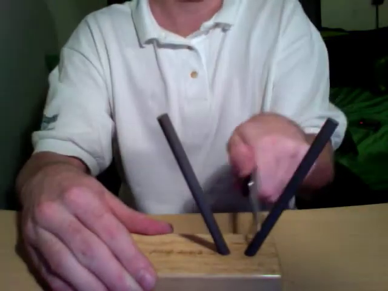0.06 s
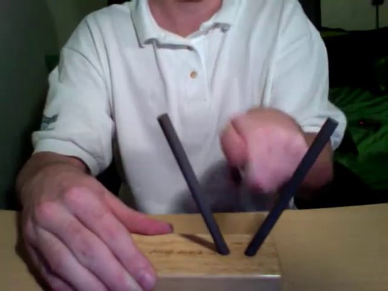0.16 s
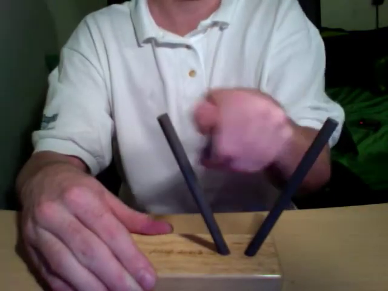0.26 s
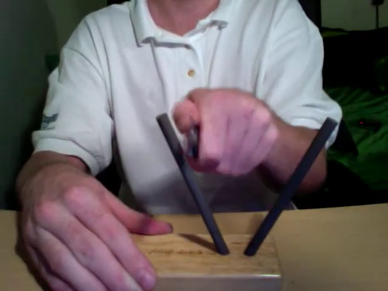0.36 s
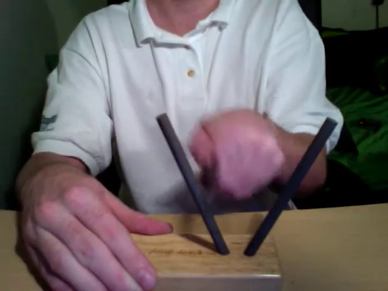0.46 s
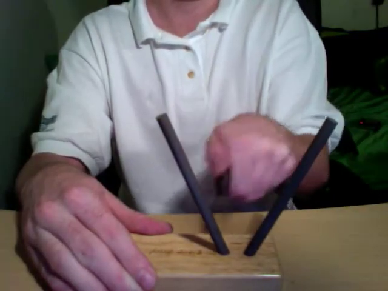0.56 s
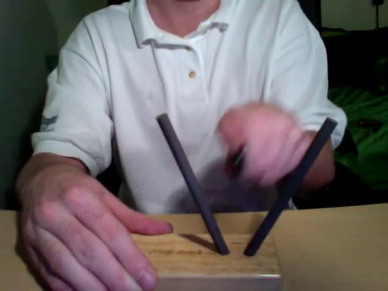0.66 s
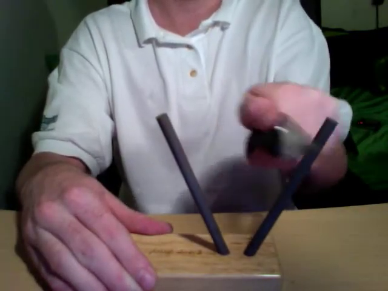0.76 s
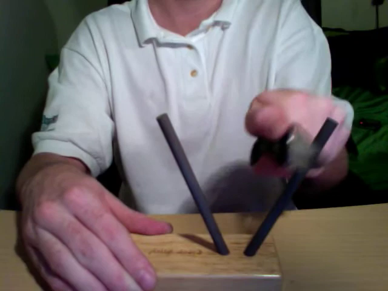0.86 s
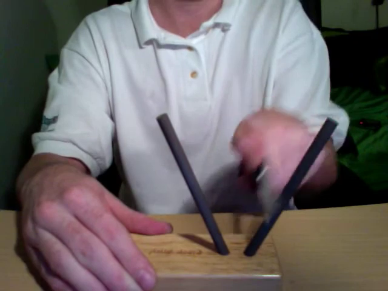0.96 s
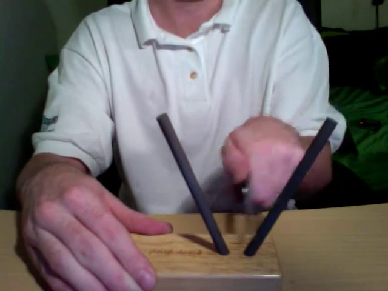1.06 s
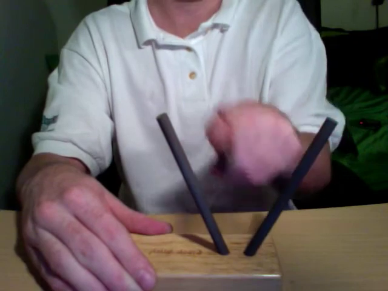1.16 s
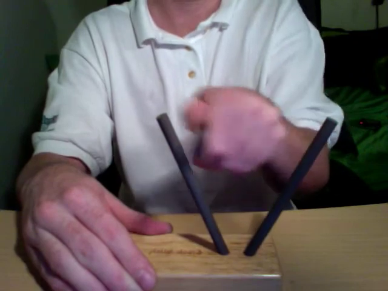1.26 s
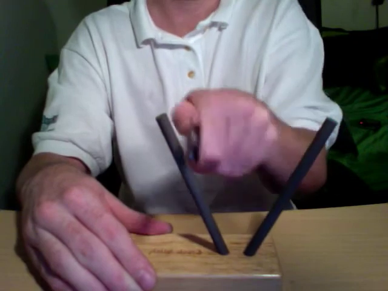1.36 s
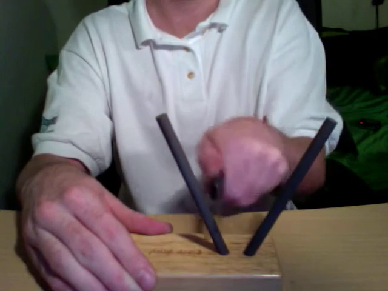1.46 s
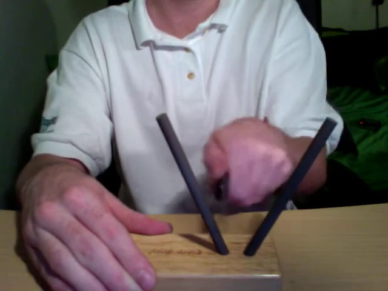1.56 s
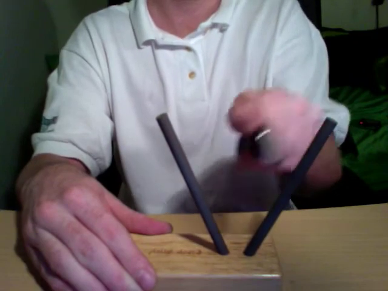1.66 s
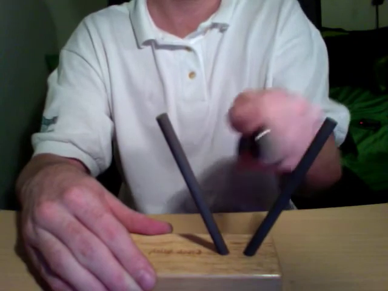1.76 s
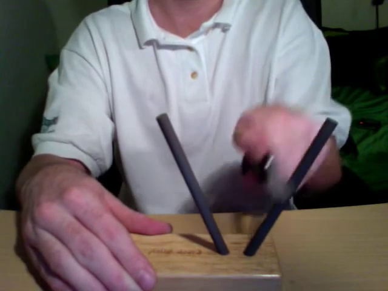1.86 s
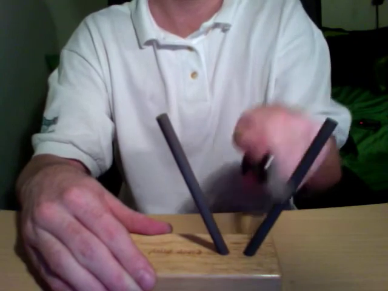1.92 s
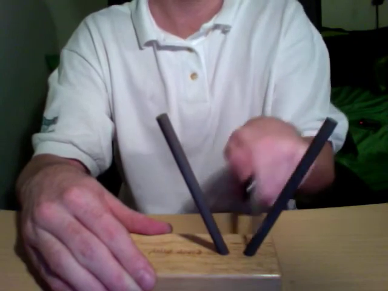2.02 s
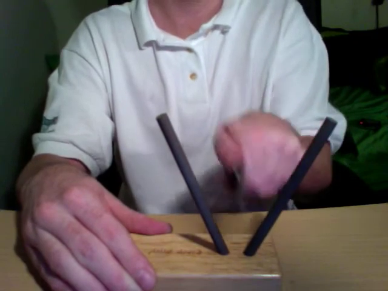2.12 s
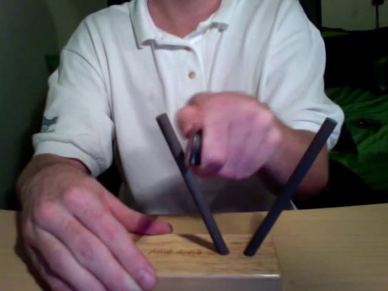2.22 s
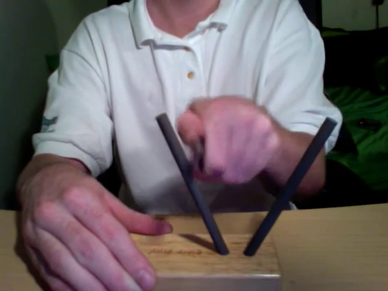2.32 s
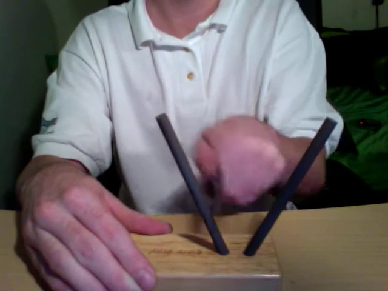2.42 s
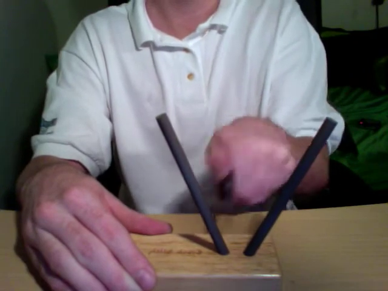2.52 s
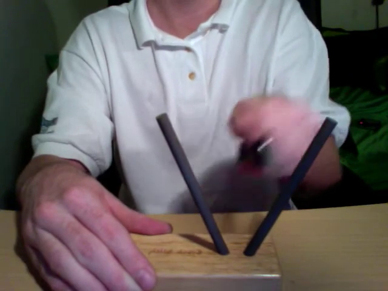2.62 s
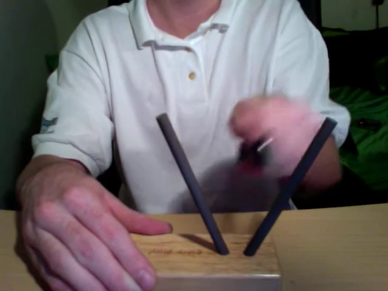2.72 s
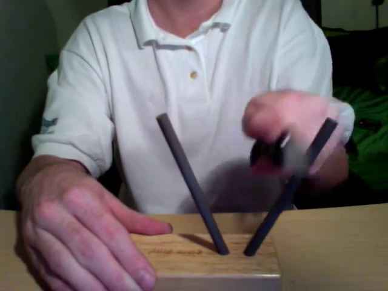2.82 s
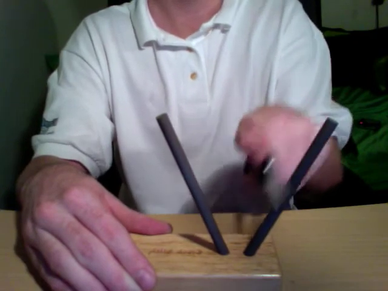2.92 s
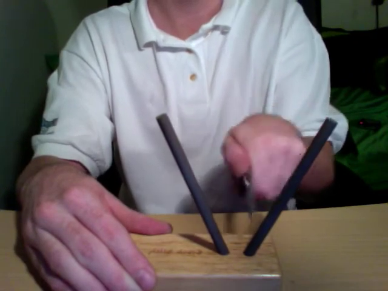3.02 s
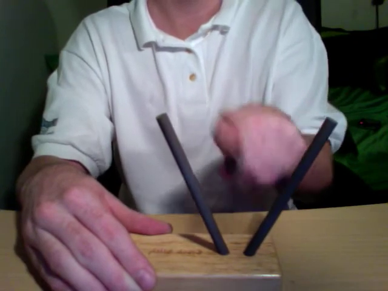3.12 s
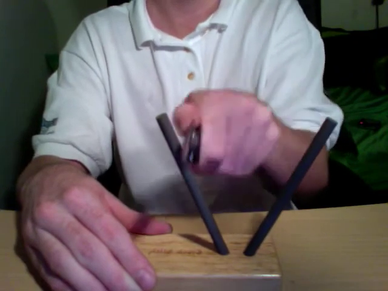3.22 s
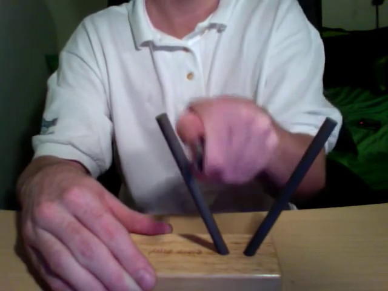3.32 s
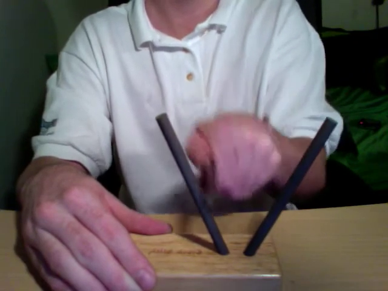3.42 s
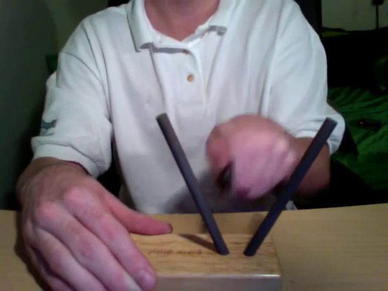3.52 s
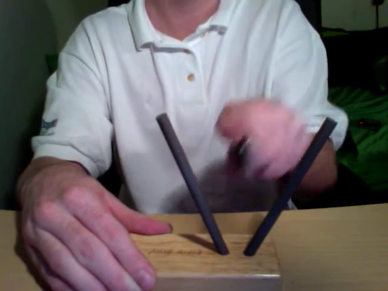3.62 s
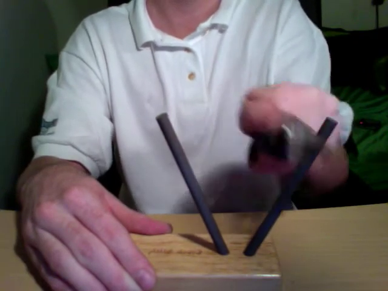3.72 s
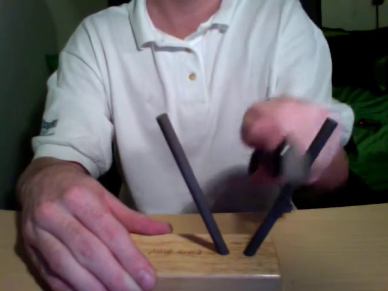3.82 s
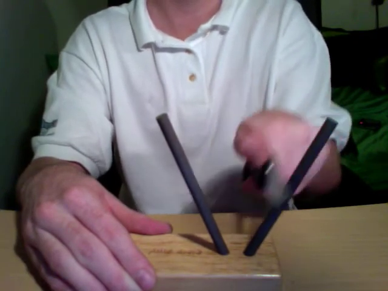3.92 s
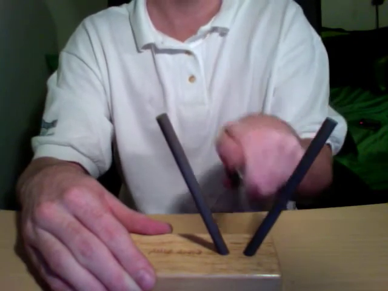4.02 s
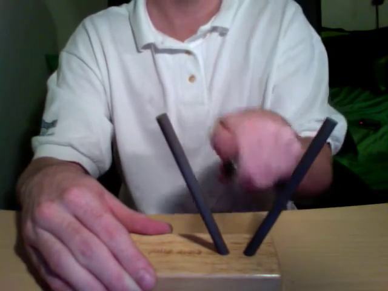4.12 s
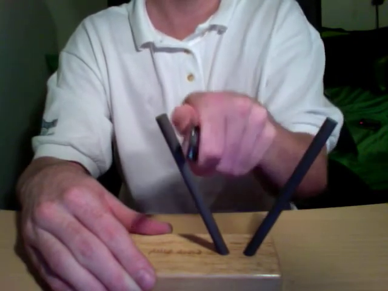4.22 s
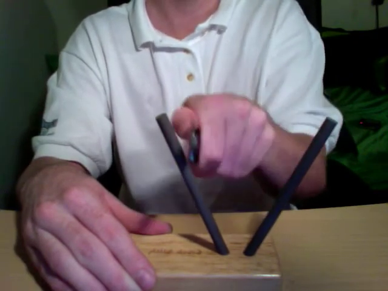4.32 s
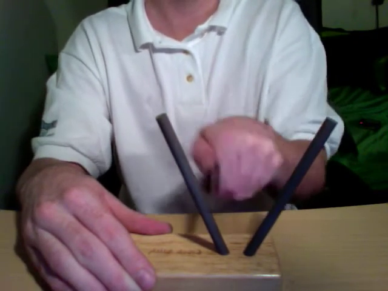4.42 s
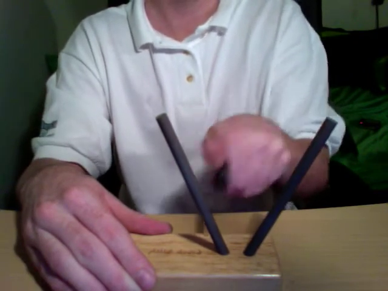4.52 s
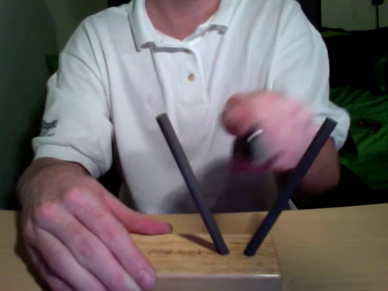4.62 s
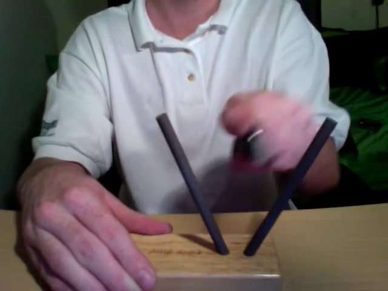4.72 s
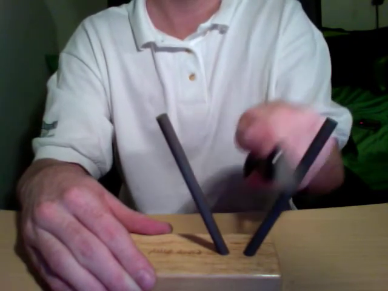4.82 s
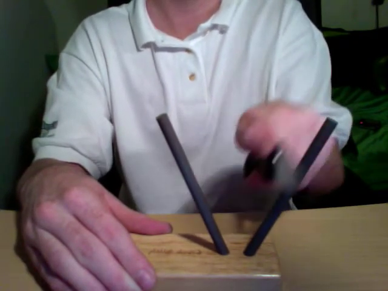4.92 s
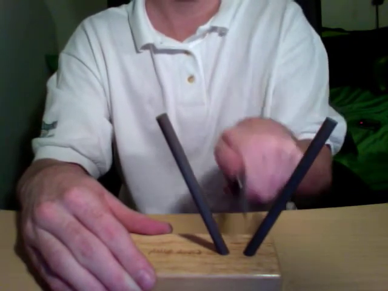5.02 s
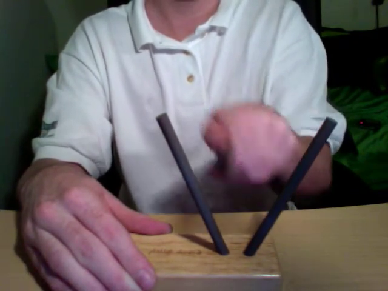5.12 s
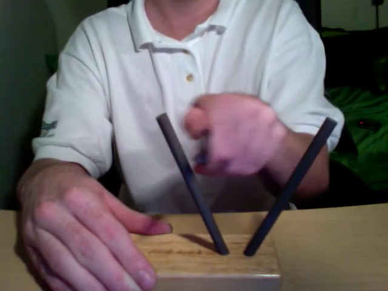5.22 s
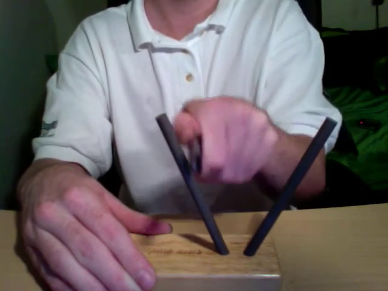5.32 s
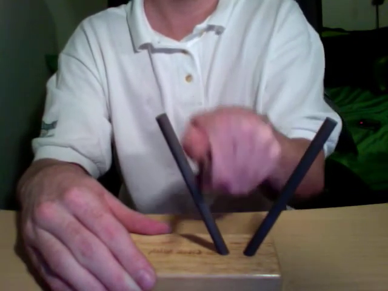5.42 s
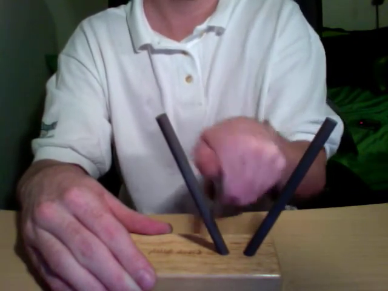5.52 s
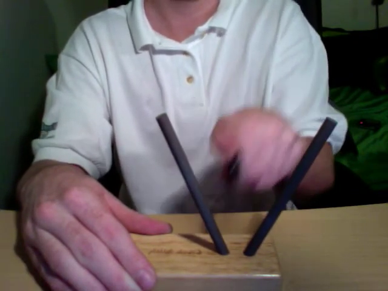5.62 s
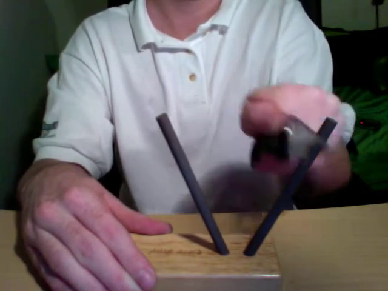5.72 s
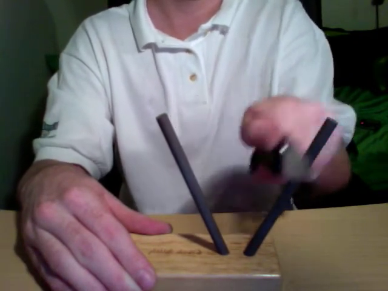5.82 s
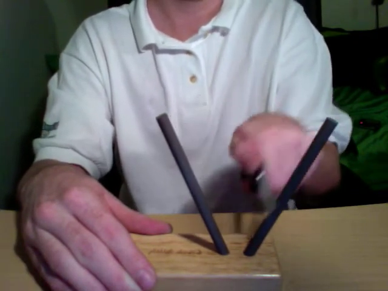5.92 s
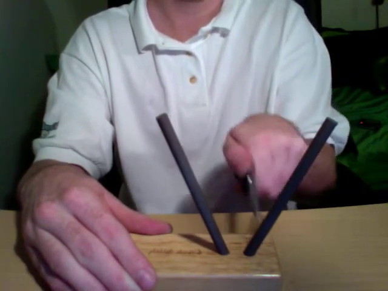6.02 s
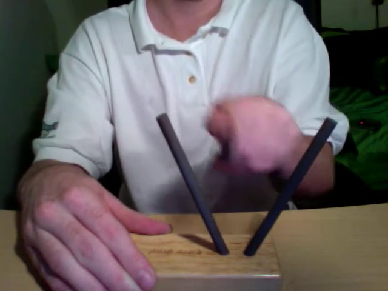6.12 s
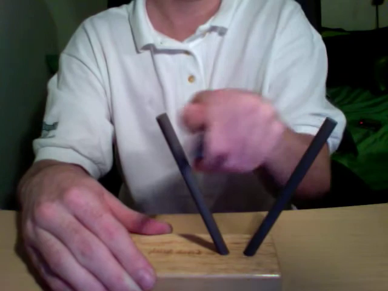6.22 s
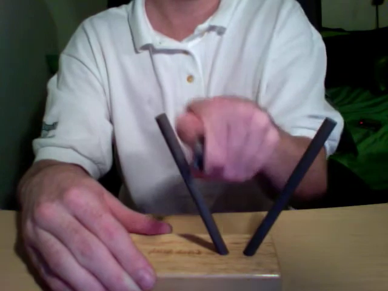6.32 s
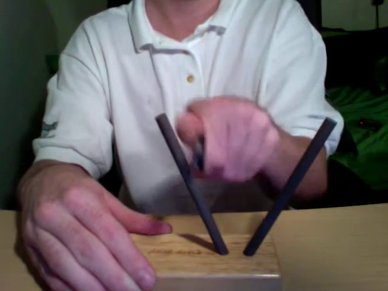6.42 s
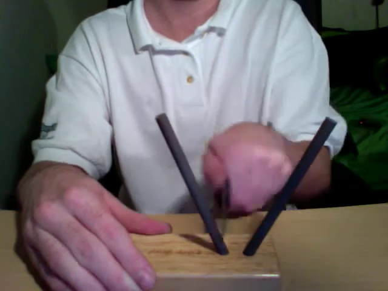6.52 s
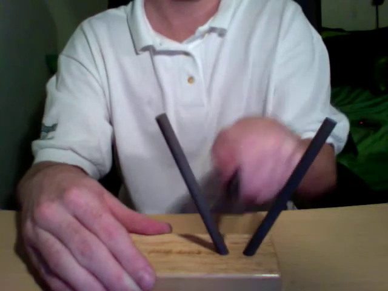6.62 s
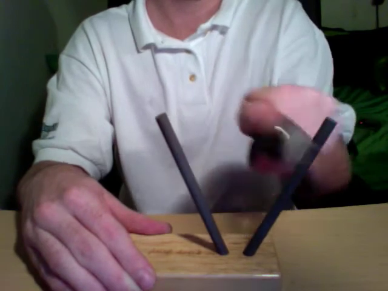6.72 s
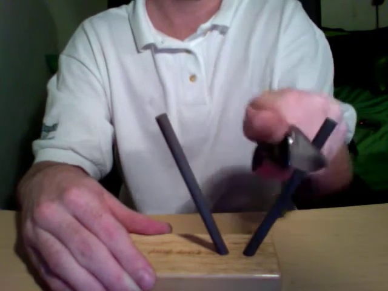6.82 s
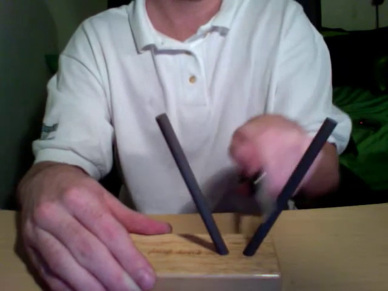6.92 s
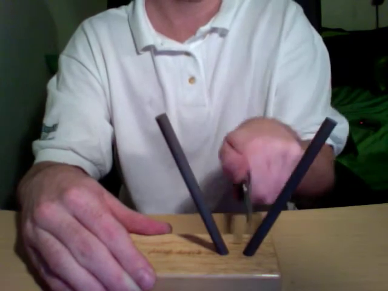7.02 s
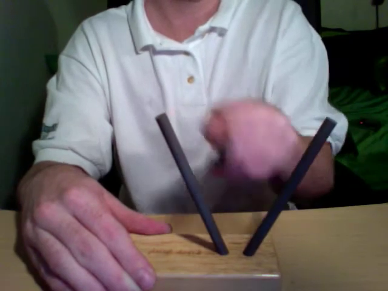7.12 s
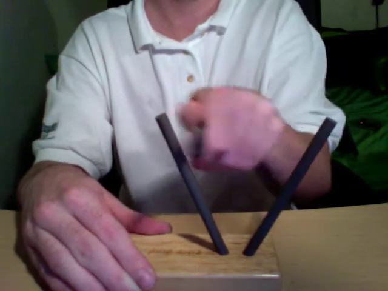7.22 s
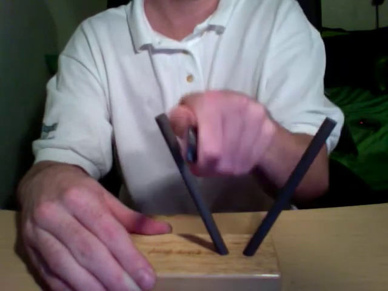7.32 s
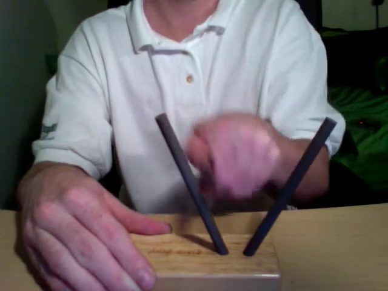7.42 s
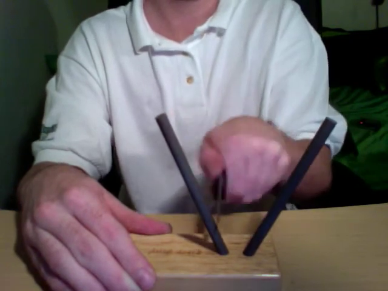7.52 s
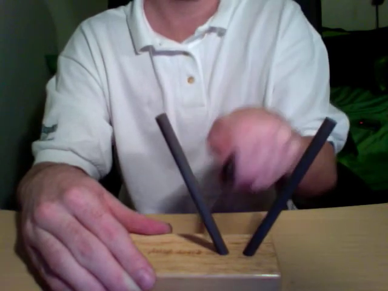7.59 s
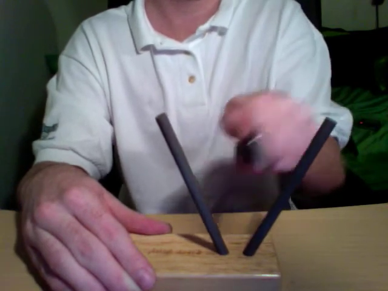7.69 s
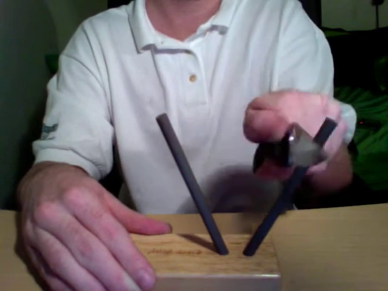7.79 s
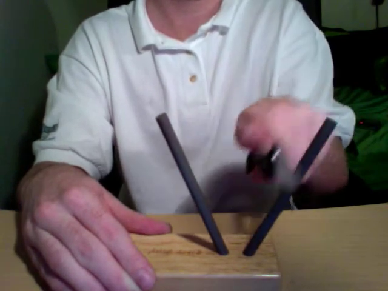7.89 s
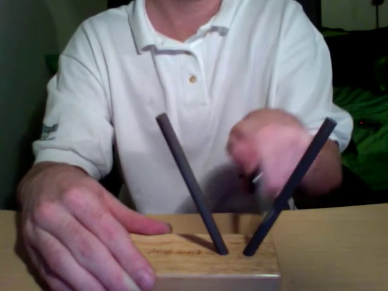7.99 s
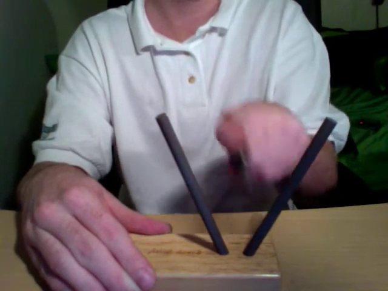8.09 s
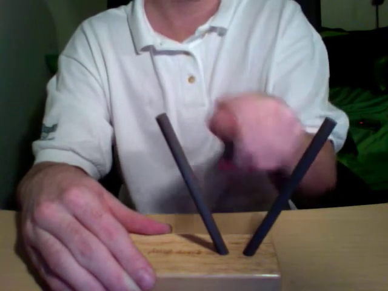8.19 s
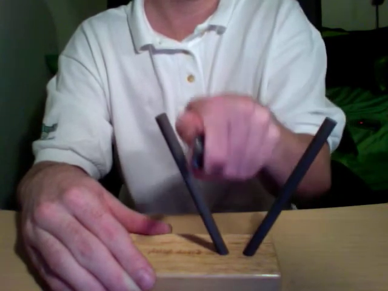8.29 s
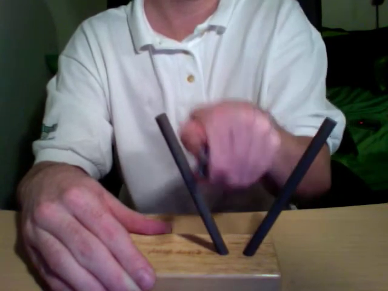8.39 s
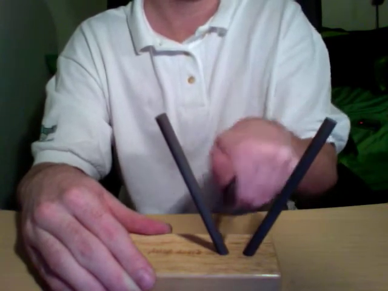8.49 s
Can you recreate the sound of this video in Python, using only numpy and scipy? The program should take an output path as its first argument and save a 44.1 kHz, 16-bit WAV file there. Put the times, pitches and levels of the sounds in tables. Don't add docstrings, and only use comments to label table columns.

```python
import sys
import numpy as np
from scipy import signal
from scipy.fft import rfft, irfft, next_fast_len
from scipy.io import wavfile
from scipy.ndimage import uniform_filter1d, map_coordinates

SR = 44100
rng = np.random.default_rng(int(sys.argv[2]) if len(sys.argv) > 2 else 0)


def makeup_ratio(level_db):
    decades = np.asarray(level_db, float) / 20
    return 10 ** decades


def wrap_up_sound(samples):
    columns = np.atleast_2d(samples).T
    tamed = np.clip(columns, -1, 1)
    steps = np.round(tamed * 32767).astype(np.int16)
    wavfile.write(sys.argv[1], SR, steps)


N = 377055

# [t/s, peak level/dB, table thud/dB, block/dB, upper rod mode/dB], last three against the peak
LANDINGS = [(0.3499, -23.5, -13.5, -23, -17), (0.8565, -13, -15, -2, -9.5),
            (1.3197, -24.5, -13, -12, -16.5), (1.8179, -11, -15, -3, -14.5), (2.2978, -25, -17, -20, -9.5),
            (2.777, -16.5, -17, -3.5, -6), (3.3017, -26, -18, -11, -17.5), (3.8145, -13, -16, -1, -5),
            (4.2905, -29.5, -12.5, -9, -18), (4.8274, -10.5, -15.5, -1, -8.5),
            (5.3152, -24, -18.5, -19.5, -12), (5.8227, -13, -16.5, -7.5, -23),
            (6.3056, -20.5, -14, -14, -16), (6.833, -11.5, -16.5, -2.5, -3.5),
            (7.3167, -24, -15, -16.5, -16), (7.82, -10.5, -15.5, 0, -9.5), (8.3454, -24, -18, -5.5, -10.5)]
# [contact t/s, place of hardest push 0-1, rod level there/dB, lighter at first/dB, edge bite/dB]
STROKES = [(0.24, 0.68, -31.5, 14, 0.5), (0.23, 0.6, -34, 22, 1.5), (0.22, .7, -29.5, 13.5, -1.5),
           (0.24, 0.6, -35.5, 16.5, 1), (.23, 0.7, -30, 12, -2), (0.24, 0.75, -36, 15, 1),
           (0.2546, 0.6, -31, 14.5, -1), (0.22, 0.79, -36.5, 11.5, 1), (0.22, 0.69, -31, 9.5, 5.5),
           (0.26, 0.54, -33.5, 17.5, 2), (0.23, 0.61, -31.5, 11.5, 1), (0.23, 0.72, -36, 16, -2),
           (0.2238, 0.68, -33, 10, -0.5), (0.2621, 0.63, -33.5, 27, 1.5), (0.22, .77, -30.5, 13, 0),
           (.24, 0.68, -36, 13.5, 2), (0.2362, 0.64, -30.5, 14.5, -2.5), (0.19, 0.85, -34.5, 11.5, -2.5)]
BOUNCE_S = 0.019


def unit(x):
    return x / np.sqrt(np.mean(x ** 2) + 1e-20)


def along(points, hz):
    f, v = np.transpose(points)
    return np.interp(np.log(hz + 1), np.log(f + 1), v)


def filtered(x, response):
    m = next_fast_len(N + SR // 4)
    return irfft(rfft(x, m) * response(np.fft.rfftfreq(m, 1 / SR)), m)[..., :N]


def coloured(x, spectrum):
    return unit(filtered(x, lambda f: makeup_ratio(along(spectrum, f))))


def resonant(x, peaks):
    narrowest_hz = 70

    def response(f):
        total = 0
        for k, (centre, width, db) in enumerate(peaks):
            loss = 1j * f * max(width, narrowest_hz)
            total = total + (-1) ** k * makeup_ratio(db) * loss / (centre * centre - f * f + loss)
        return total

    return unit(filtered(x, response))


def wobble(rate):
    knots = rng.standard_normal(int(N * rate / SR) + 4)
    return map_coordinates(knots, [np.arange(N) * rate / SR])


def rasp():
    # [f/Hz, width/Hz, level/dB]
    rod_modes = [
        [[(1430, 180, -3), (1630, 180, -4), (2192, 54, -4.5), (2725, 200, -37), (2740, 680, -1.5)],
         [(1320, 11, -3.5), (1720, 270, 11), (2225, 98, 13), (2467, 17, 15.5), (3100.4, 160, -2.5)],
         [(1720, 120, -8.5), (2150, 250, -10), (2756, 470, 8.5), (2880, 190, -2), (3140, 130, -4.5)]],
        [[(1720, 60, -25), (2230, 290, 33.5), (2730, 130, 36.5), (2883, 15, 40.5), (2960, 210, 25)],
         [(1758, 100, 3.5), (2207, 7.2, -2.5), (2530, 60, -5.5), (3148, 180, -6.5)], [(1720, 61, -5.5),
         (2093.2, 120, 19.5), (2466, 140, 17), (3113, 570, 4)]],
    ]
    # [f/Hz, width/Hz, level/dB]
    block_modes = [
        [[(190, 20, -2.5), (350, 46, 2.5), (614, 60, 9), (821, 50, 7), (1000, 150, -8.5)], [(105.3, 38, -14),
         (400, 75, -16.5), (626, 59, 7.5), (790, 60, 15), (1136, 170, 18)]],
        [[(201, 76, -6.5), (413, 64, 14), (574, 63, -24), (713, 280, 15.5), (980, 200, -12)], [(102.8, 37, -5),
         (389, 80, -3.5), (604, 280, -16.5), (824, 160, 50), (1250, 420, -7)]],
    ]
    # [f/Hz, width/Hz, level/dB]
    blade_modes = [
        [[(4160, 130, 3), (4574, 380, -1.5), (4950, 300, -3.5), (6330, 77, -16)], [(3740, 890, 2.5),
         (4120, 350, -5.5), (5080, 130, -5), (5900, 160, -9)]],
        [[(3317, 320, 4.5), (3730, 940, 2.5), (5070, 1600, -6.5), (5390, 470, -2.5)], [(3370, 990, 2.5),
         (4020, 220, 4), (4860, 4800, -12.5), (5740, 560, -18)]],
    ]
    # [f/Hz, level per Hz/dB]
    hiss_spectra = [
        [[(3650, -40.5), (6200, -4), (6420, -5), (7640, 0), (8090, 1), (10500, -15.5), (12900, -8.5),
         (15600, -31.5)], [(3650, -30), (6200, 7.5), (6440, -6), (8120, -14), (9020, 2.5), (9850, -11.5),
         (14600, -21.5), (15600, -18.5)]],
        [[(3650, -37), (6200, -44.5), (6750, 6), (7910, 2), (8600, -6.5), (10000, -10.5), (11100, -5),
         (15600, -23.5)], [(3650, -11.5), (6200, 6.5), (7640, -10.5), (8510, -8), (9230, 1), (9820, -11.5),
         (13500, -7.5), (15600, -12.5)]],
    ]

    rod_gain, block_gain, blade_gain, hiss_gain = pressure()
    push = grit(uneven_db=0.5, patchy_db=-0.5, streaky_db=1.65, catch_rate=560, catch_db=11.5)
    push = filtered(push, lambda f: 1 / (1 + (f / 5000) ** 4))
    scratch = grit(uneven_db=0.3, patchy_db=2.0, streaky_db=2.5, catch_rate=970, catch_db=11.5)
    scrape = filtered(scratch[::-1], lambda f: 1 / (1 + (f / 7000) ** 6))
    airborne = filtered(scratch, lambda f: f < 15750)

    rod = rod_gain * sliding(push, rod_modes, resonant)
    block = block_gain * sliding(push[::-1], block_modes, resonant)
    blade = blade_gain * sliding(scrape, blade_modes, resonant)
    hiss = hiss_gain * sliding(airborne, hiss_spectra, coloured)
    return rod + block + blade + hiss


def pressure():
    # [level under the rod at the peak/dB, share of the push felt, drift over the stroke/dB]
    follow = [
        [(-10, 0.38, 1.5), (-10.5, 0.57, -10), (-26, -0.3, 2)],
        [(-5.5, 0.56, -7.5), (-9, .6, -9.5), (-24, 0.2, -8)],
    ]
    by_rod = np.array([
        (3, 1.5),
        (11, 7),
        (0.035, 0.032),
        (0.5, 0.72),
        (1000, 800)])
    airborne_db, lift_lag_s = 8, 0.0069
    hand_db, hand_rate = 1.31, 25
    usual_s, slow_db_per_s, slow_for = 0.24, 252.5, 0.4

    stroke, since, gone = stroke_clock()
    contact_s, peak, rod_db, light_db, bite_db = np.transpose(STROKES)[:, stroke]
    swell, ease_db, grip_s, grip_db, lift = by_rod[:, stroke % 2]

    building = 1 - np.clip(gone / peak, 0, 1) ** swell
    easing = np.clip((gone - peak) / (1 - peak), 0, 1) ** 2
    push_db = -light_db * building - ease_db * easing

    touch_db = rod_db - airborne_db * (since < BOUNCE_S)
    touch_db -= grip_db * light_db * np.exp(-(since / grip_s) ** 2)
    touch_db -= lift * np.clip(since - contact_s - lift_lag_s, 0, 1)
    touch_db += hand_db * wobble(hand_rate)

    slow_start_db = slow_db_per_s * np.clip(contact_s - usual_s, 0, 1)
    bite_db = bite_db - slow_start_db * np.exp(-(gone / slow_for) ** 2)
    under_db, share, drift_db = np.transpose(follow)[..., stroke % 2]
    parts_db = under_db + share * push_db + drift_db * (np.clip(gone, 0, 1) - peak)
    parts_db += np.outer([0, 0.5, 1], bite_db)
    return makeup_ratio(touch_db + np.vstack([push_db, parts_db]))


def stroke_clock():
    t = np.arange(N) / SR
    starts = np.r_[-0.15, np.transpose(LANDINGS)[0]]
    stroke = np.searchsorted(starts, t) - 1
    since = t - starts[stroke]
    return stroke, since, since / np.transpose(STROKES)[0][stroke]


def grit(uneven_db, patchy_db, streaky_db, catch_rate, catch_db):
    catches = (rng.random(N) < catch_rate / SR) * rng.standard_normal(N) * makeup_ratio(catch_db)
    z = signal.stft(rng.standard_normal(N) + catches, nperseg=512)[2]

    def field(bins, frames):
        smooth = uniform_filter1d(rng.standard_normal(z.shape), size=bins, axis=0)
        return unit(uniform_filter1d(smooth, size=frames, axis=1))

    texture_db = patchy_db * field(bins=10, frames=6) + streaky_db * field(bins=2, frames=14)
    force = signal.istft(z * makeup_ratio(texture_db), nperseg=512)[1][:N]
    return unit(force * makeup_ratio(uneven_db * (wobble(60) + 0.61 * wobble(250))))


def edge_place():
    stroke, _, gone = stroke_clock()
    return stroke % 2, np.clip(0.8074 * gone, 0, 1)


def sliding(force, bodies, sound):
    side, place = edge_place()
    out = np.zeros(N)
    for s, places in enumerate(bodies):
        for k, body in enumerate(places):
            near = np.clip(1 - abs(place * (len(places) - 1) - k), 0, 1)
            out += (side == s) * np.sqrt(near) * sound(force, body)
    return out


def landings():
    # [f/Hz, level/dB, t60/s]
    ring_modes = [
        [[(151, -8, 0.099), (178.3, -8, 0.43), (250, 1.5, 0.024)], [(583, -24, 0.036), (760, -11.5, 0.012),
         (904.5, -25.5, 0.075)], [(3800, 6.5, 0.012), (4310, 15.5, 0.0051), (4370, -0.5, 0.0083),
         (6220, -6, 0.016)], [(2650, 1, .025)], [(1432, -9.5, 0.018), (1706, 0, 0.014), (1800, -7, .018)]],
        [[(135.4, -17, 0.42), (201, -3, 0.407), (308, -2, 0.0433)], [(633, -4, 0.044), (867, -0.5, 0.03),
         (1132, -16.5, 0.11)], [(3560, -3.5, 0.008), (4700, 8, 0.0035), (5640, 9, 0.0042), (6520, -9, 0.028),
         (9141, -12.5, 0.031)], [(2680, 10, 0.038)], [(1692, 2, 0.016), (1878, -0.5, 0.027)]],
    ]
    # [f/Hz, level per Hz/dB]
    crack_spectrum = [(500, -7.5), (1500, -5), (4000, 4.5), (6000, -4.5), (10000, -15), (16000, -21.5)]
    blade_tick_db = (-10, -5)
    spread_db, spread = 1, 0.015

    out, t = np.zeros(N + SR), np.arange(SR // 4) / SR
    splinter = coloured(rng.standard_normal(N), crack_spectrum)

    def ringing(modes, luck, phase):
        total = 0
        for i, (hz, level, t60) in enumerate(modes):
            decay = makeup_ratio(level + spread_db * luck[i] - 60 * t / t60)
            pitch = hz * (1 + spread * luck[-1 - i])
            total = total + decay * np.sin(2 * np.pi * pitch * t + phase[i])
        return total

    def rise(tau):
        return (1 - np.exp(-t / tau)) ** 2

    for k, (s, db, thud_db, block_db, upper_db) in enumerate(LANDINGS):
        side = (k + 1) % 2
        luck, phase = rng.standard_normal((5, 10)), 2 * np.pi * rng.random((5, 5))
        parts = [ringing(modes, u, p) for modes, u, p in zip(ring_modes[side], luck, phase)]
        thud, block, blade, upper, lower = parts
        crack_decay = makeup_ratio(2.5 - 60 * t / 0.015) + makeup_ratio(-17 - 60 * t / 0.061)
        crack = splinter[k * len(t):][:len(t)] * crack_decay

        tick = rise(0.00039) * (lower + makeup_ratio(upper_db + 0.5) * upper)
        tick += rise(0.00015) * makeup_ratio(block_db + 7.0) * block
        tick += rise(0.0002) * makeup_ratio(blade_tick_db[side]) * (blade + crack)
        thud *= rise(0.00051) * (0.16 + 0.56 / (1 + (t / 0.014) ** 6))

        hit = round((s - 0.0012) * SR)
        out[hit:][:len(t)] += makeup_ratio(db) * (makeup_ratio(-0.5) * tick + makeup_ratio(thud_db + 9.5) * thud)
        bounce = round((s + BOUNCE_S + 0.0015 * luck[0, 4]) * SR)
        out[bounce:][:len(t)] += makeup_ratio(db - 20.5 + spread_db * luck[1, 4]) * tick

    def bass_cut(f):
        q = 1j * f / 115
        return q ** 2 / (1 + 1.2 * q + q ** 2)

    return filtered(out[:N], bass_cut)


def room(x):
    walls = [(100, .3), (300, .24), (1000, .23), (3000, .235), (8000, .18), (16000, .14)]
    out, step = np.zeros(N + SR), SR // 2
    for a in range(0, N, step):
        hz, t, z = signal.stft(rng.standard_normal(SR // 2), SR, nperseg=256)
        decay = makeup_ratio(-60 * t / along(walls, hz)[:, None])
        tail = signal.istft(z * decay, SR, nperseg=256)[1]
        wet = signal.fftconvolve(x[a:a + step], tail / np.linalg.norm(tail))
        out[a + 250:][:len(wet)] += wet[:len(out) - a - 250]
    return out[:N]


def background():
    room_tone = [(40, -12), (110, -8), (300, -14), (900, -10), (2000, -16), (4000, -23), (9000, -30),
                 (16000, -41)]
    fan_modes = [(143, 40, -3.5), (234, 52, 0), (410, 55, -7.5), (650, 170, -5.5)]
    tone = coloured(rng.standard_normal(N), room_tone)
    hum = np.zeros(N)
    for c, w, db in fan_modes:
        band = filtered(rng.standard_normal(N), lambda f: (f * w / (c * c - f * f + 1j * f * w)) ** 2)
        hum += makeup_ratio(2 * db) * unit(band)
    return makeup_ratio(wobble(4.5)) * (makeup_ratio(-79) * tone + makeup_ratio(-73) * hum)


def scene():
    knife = rasp() + landings()
    return (knife + makeup_ratio(-12.5) * room(knife) + background())[None]


def top_cut(x):
    return signal.sosfilt(signal.butter(12, 16830, fs=SR, output="sos"), x)


def record(dry):
    def low_cut(f, hz):
        q = 1j * f / hz
        return q ** 2 / (1 + 1.3 * q + q ** 2)

    def microphone(f):
        return low_cut(f, hz=114) * low_cut(f, hz=84.0) * np.clip((16700 - f) / 600, 0, 1)

    return top_cut(filtered(dry, microphone))


dry = scene()
out = record(dry)
wrap_up_sound(out)
```